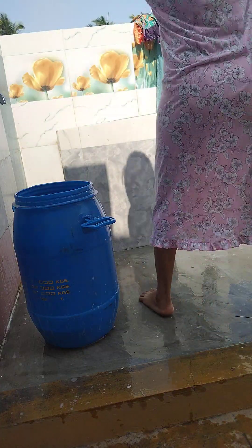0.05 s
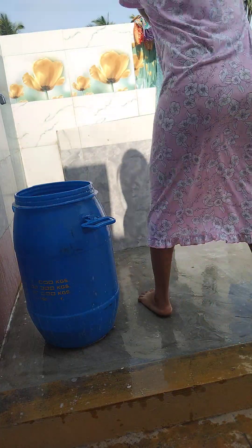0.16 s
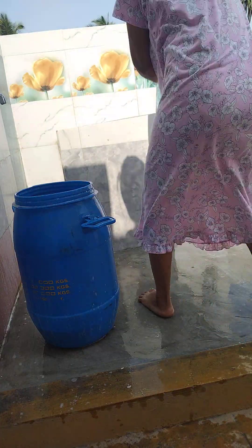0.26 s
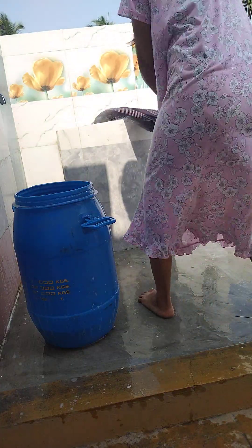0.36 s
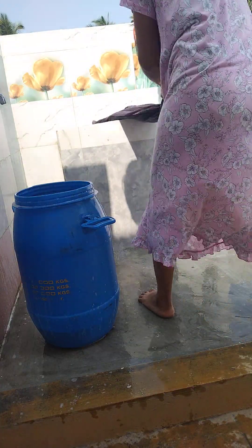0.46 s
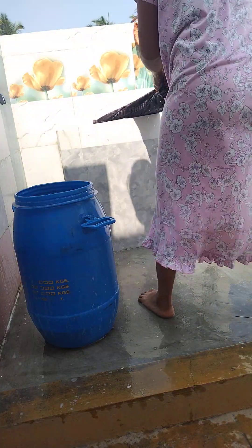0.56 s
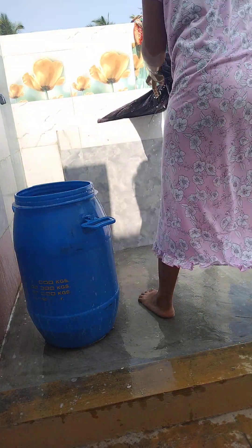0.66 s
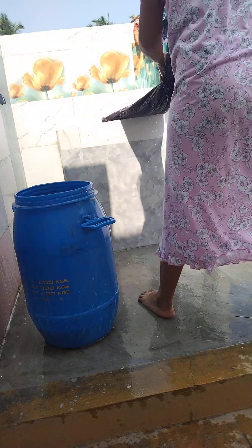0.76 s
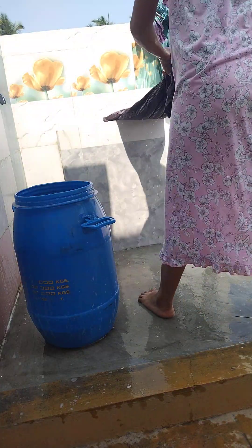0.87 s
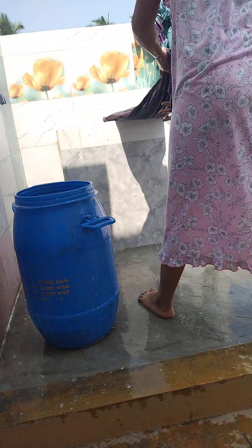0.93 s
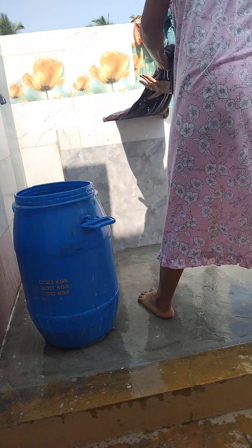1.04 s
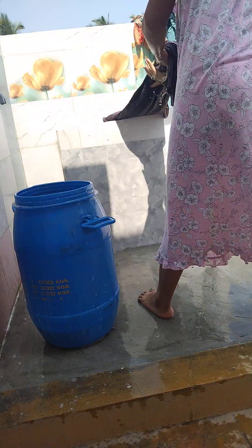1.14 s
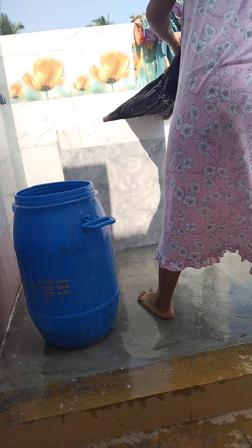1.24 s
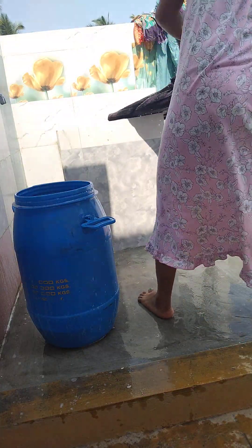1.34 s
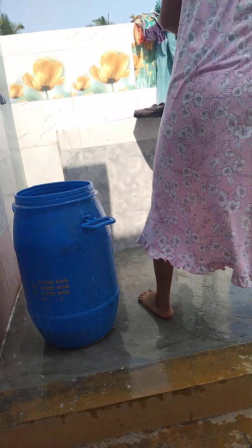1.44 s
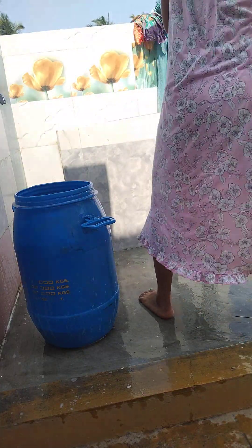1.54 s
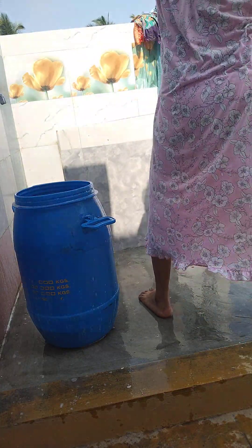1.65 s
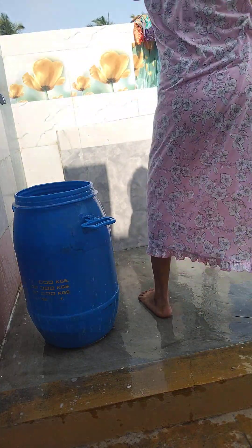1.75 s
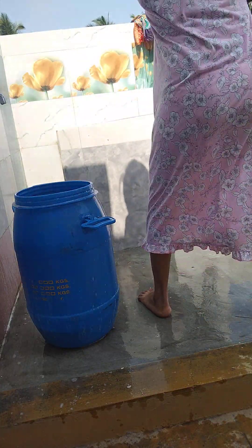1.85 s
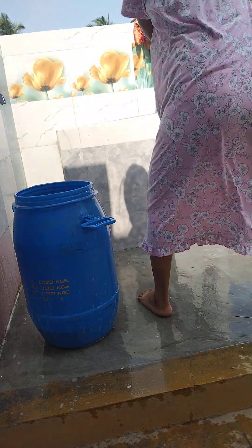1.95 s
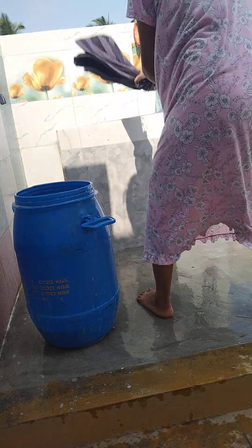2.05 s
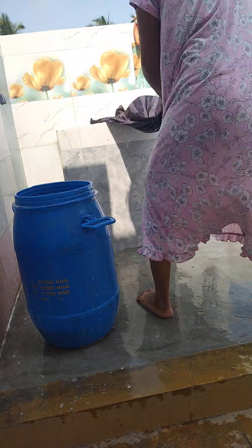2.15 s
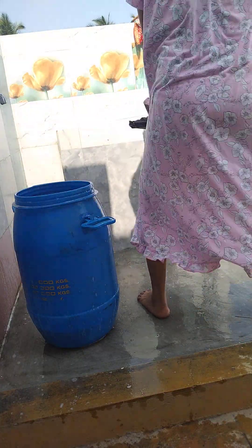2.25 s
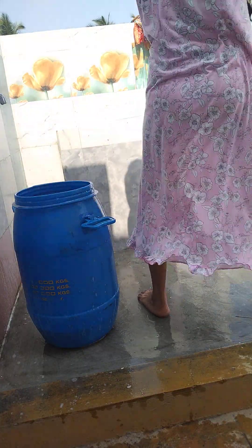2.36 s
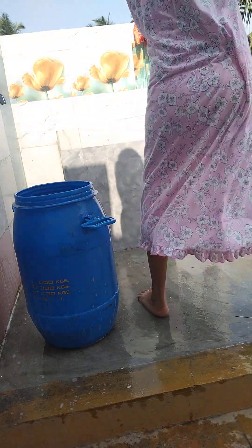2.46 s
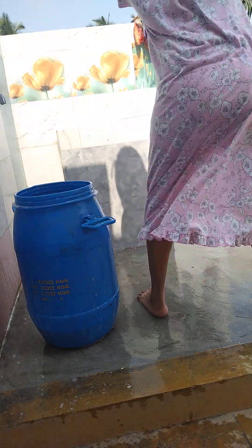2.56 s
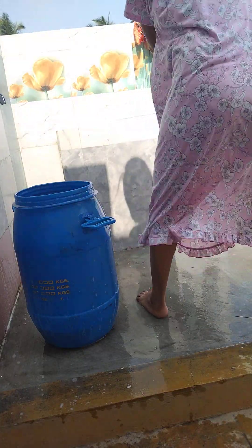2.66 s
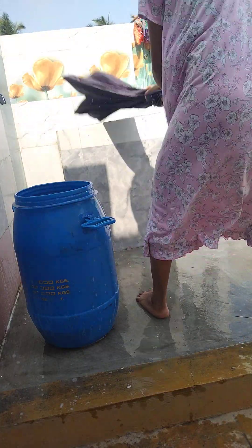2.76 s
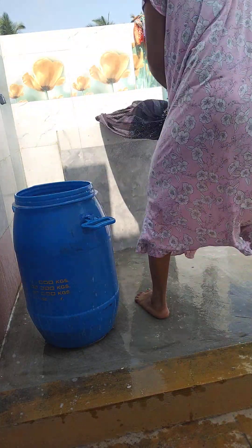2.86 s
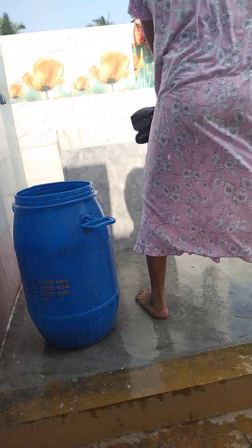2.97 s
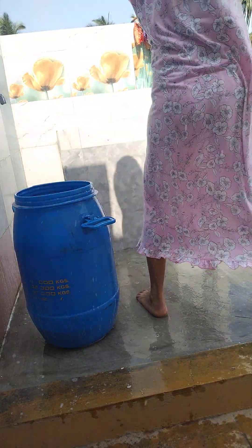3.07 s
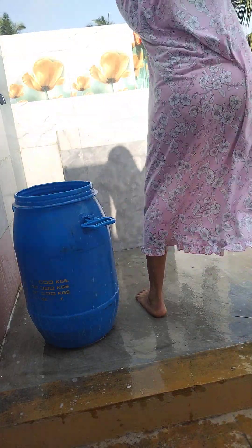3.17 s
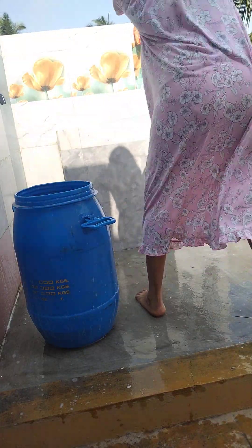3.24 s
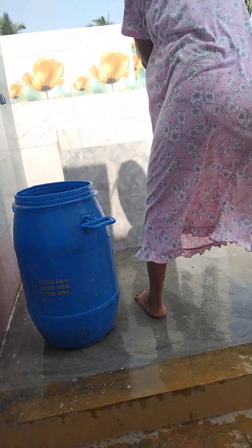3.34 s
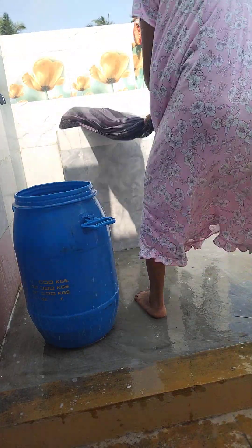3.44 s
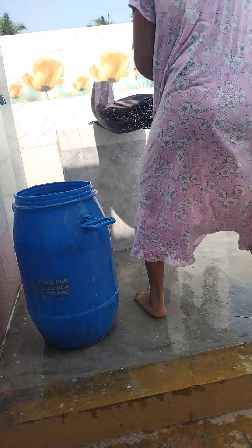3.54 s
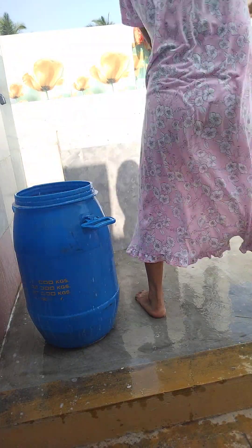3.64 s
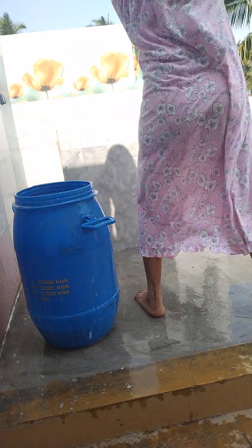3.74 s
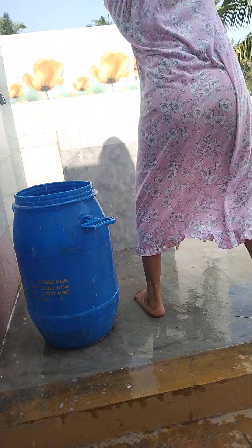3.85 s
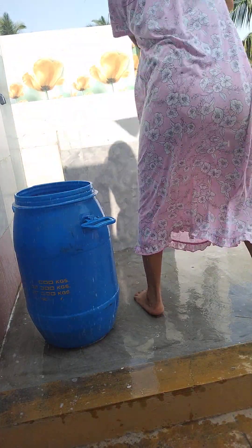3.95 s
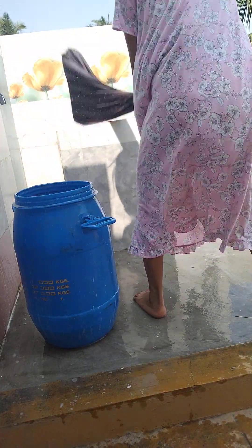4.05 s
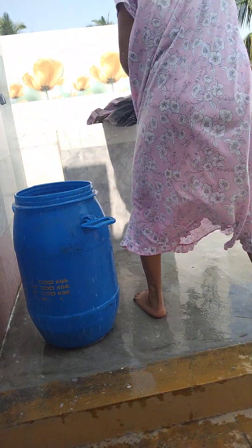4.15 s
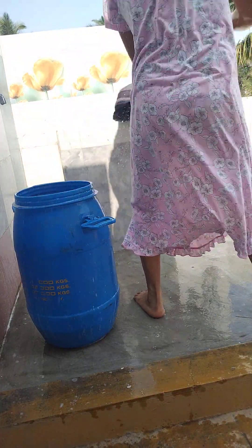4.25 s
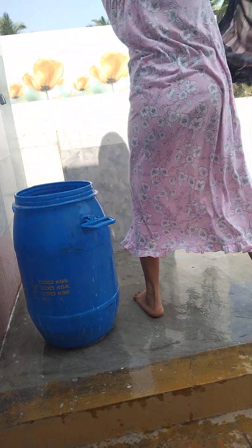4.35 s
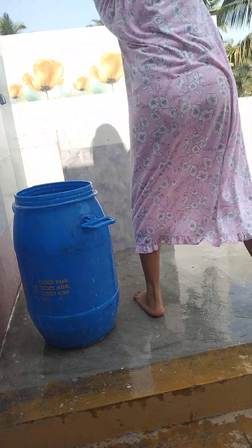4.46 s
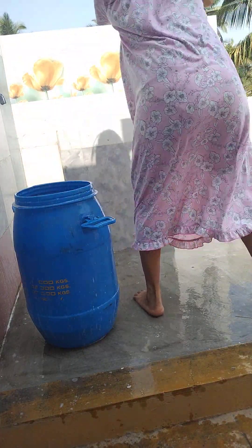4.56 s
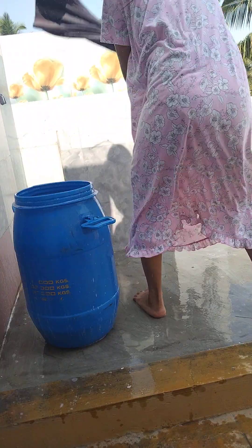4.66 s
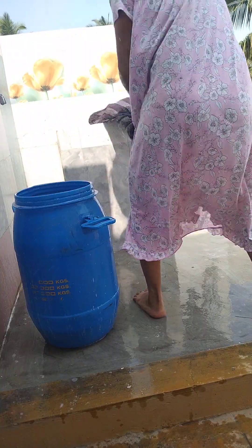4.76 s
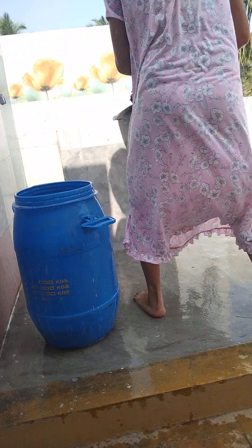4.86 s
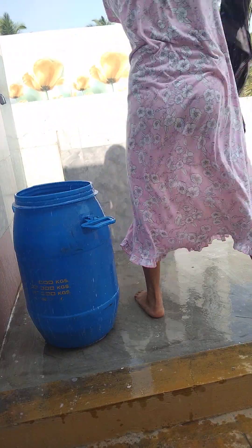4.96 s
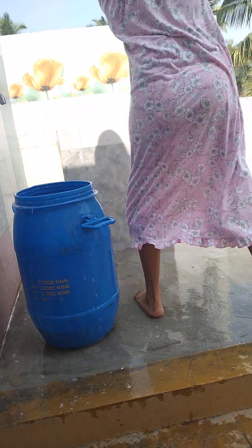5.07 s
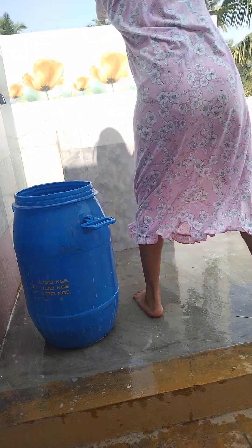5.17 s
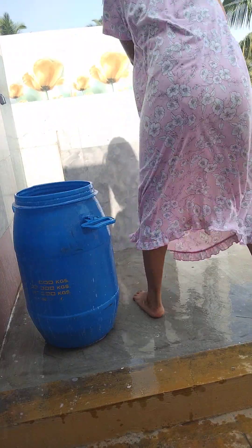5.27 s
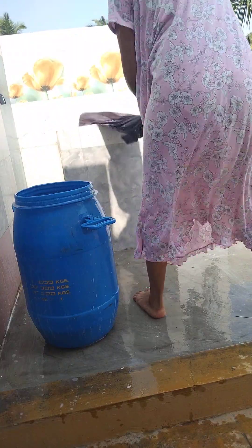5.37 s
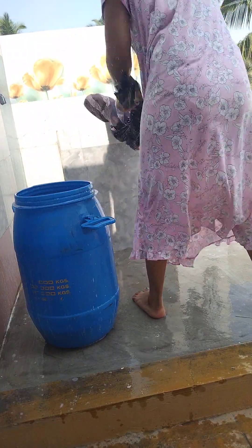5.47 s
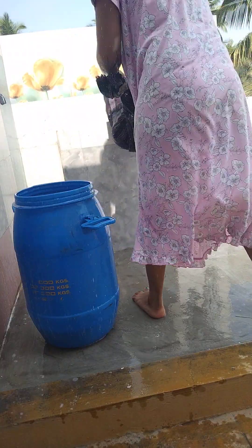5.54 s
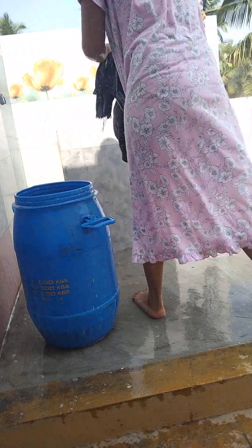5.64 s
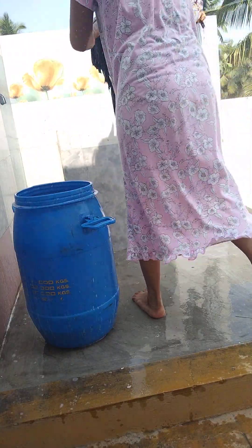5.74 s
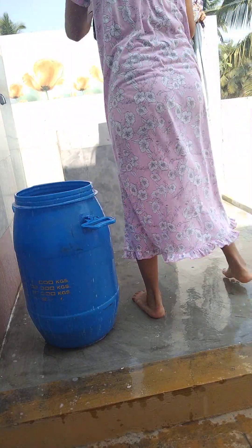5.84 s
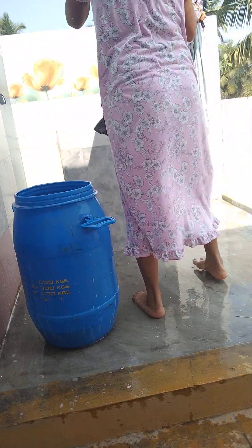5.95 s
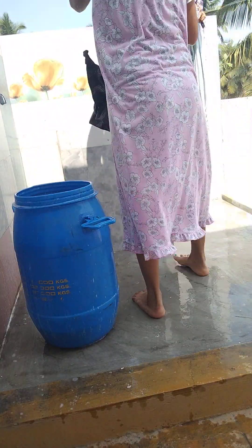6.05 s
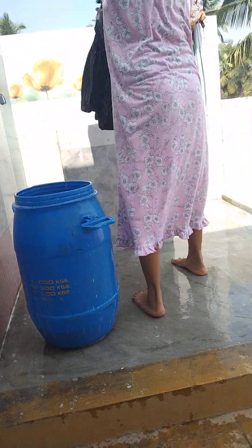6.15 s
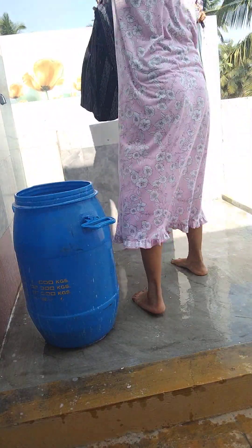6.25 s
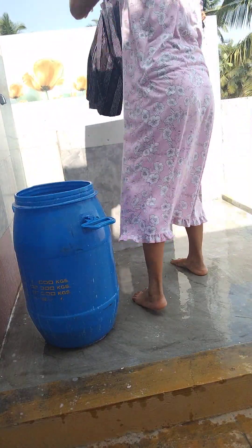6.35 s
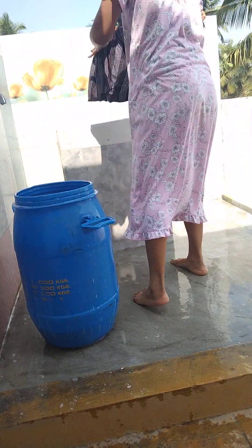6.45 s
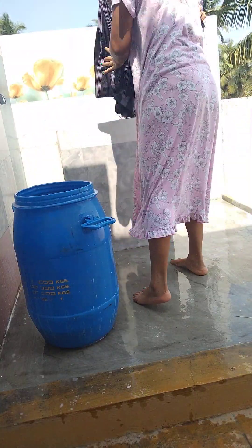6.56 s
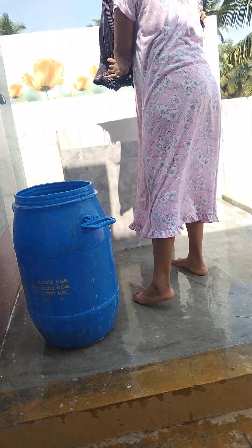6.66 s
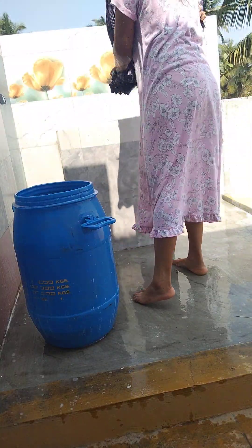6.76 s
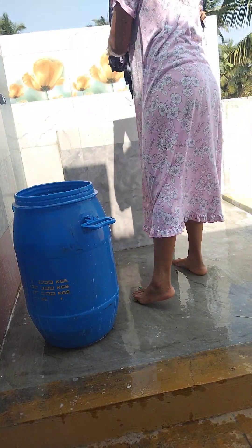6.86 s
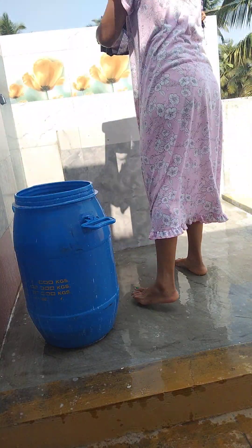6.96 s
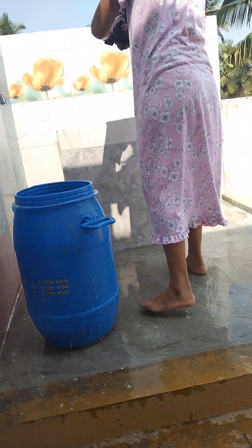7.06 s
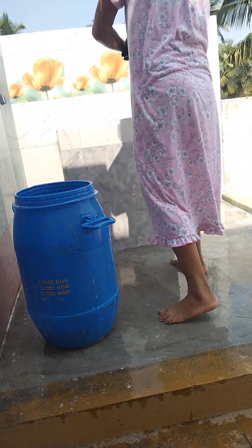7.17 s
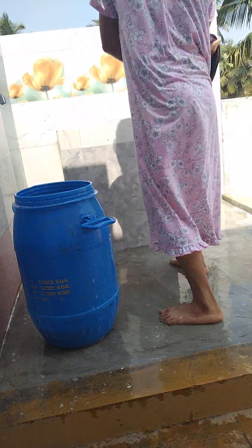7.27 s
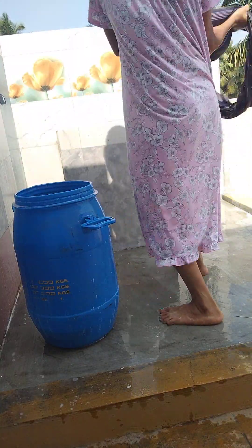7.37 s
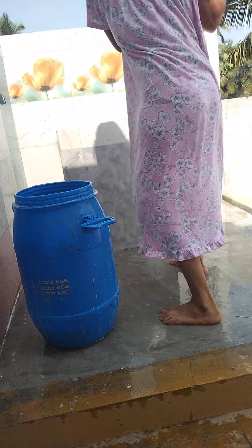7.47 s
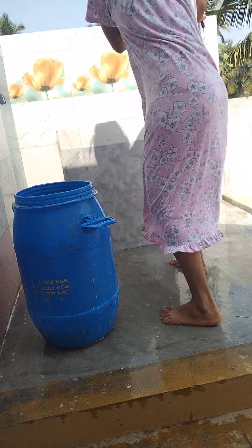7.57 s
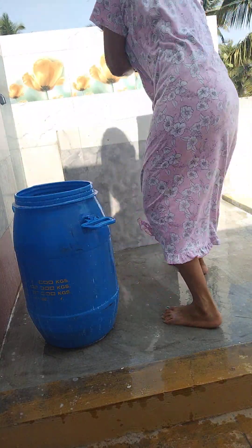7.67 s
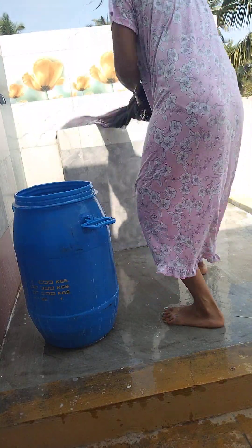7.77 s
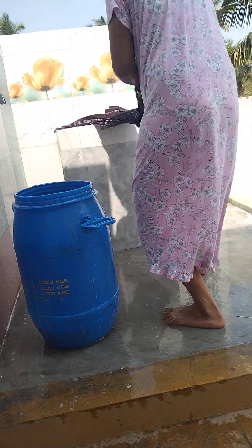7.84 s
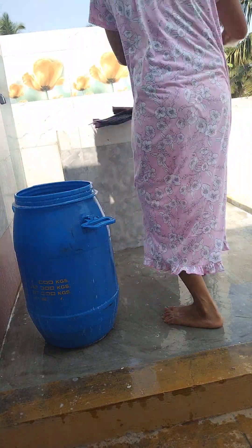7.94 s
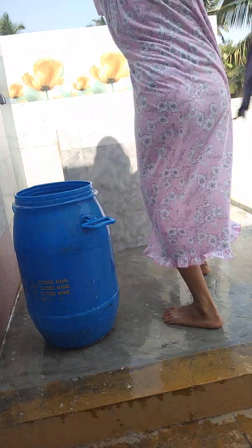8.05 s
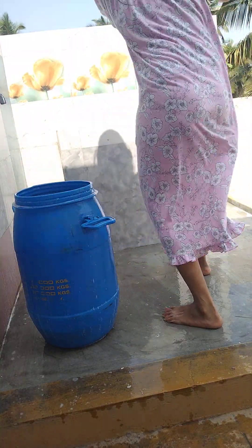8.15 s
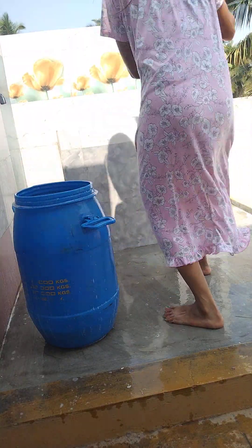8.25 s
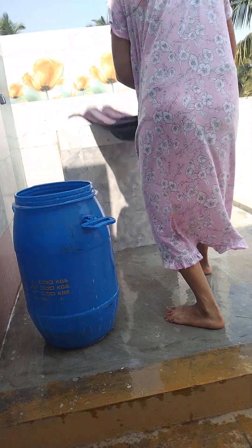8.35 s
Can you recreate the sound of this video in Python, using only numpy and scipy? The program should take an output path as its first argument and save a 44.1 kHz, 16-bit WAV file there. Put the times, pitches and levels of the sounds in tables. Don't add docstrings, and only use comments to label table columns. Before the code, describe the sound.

Wet cloth is swung and slapped hard on a stone slab again and again in a walled yard, with soft flops, drips and faint traffic hum.

```python
import sys
import numpy as np
from scipy import signal
from scipy.fft import rfft, irfft, next_fast_len
from scipy.io import wavfile
from scipy.ndimage import uniform_filter1d, map_coordinates

SR = 44100
rng = np.random.default_rng(int(sys.argv[2]) if len(sys.argv) > 2 else 0)


def voltage_ratio(decibels):
    exponent = np.asarray(decibels, float) / 20
    return 10 ** exponent


def file_out(sig):
    cols = np.atleast_2d(sig).T
    lim = np.clip(cols, -1, 1)
    pcm = np.round(lim * 32767).astype(np.int16)
    wavfile.write(sys.argv[1], SR, pcm)


N = 370881


def unit(x):
    return x / np.sqrt(np.mean(x ** 2) + 1e-20)


def along(points, hz, axis=1):
    table = np.transpose(points)
    return np.interp(np.log(hz + 1), np.log(table[0] + 1), table[axis])


def curves(rows):
    s, *cols = np.transpose(rows)
    return [np.interp(np.arange(N) / SR, s, c, left=c[0], right=c[-1]) for c in cols]


def wobble(rate_hz, count=N):
    knots = rng.standard_normal(int(count / SR * 1000) + 4)
    return map_coordinates(knots, [np.arange(count) * min(rate_hz, 999) / SR])


def noise(gain, count):
    m = next_fast_len(count)
    spectrum = rfft(rng.standard_normal(m)) * gain(np.fft.rfftfreq(m, 1 / SR))
    return unit(irfft(spectrum, m)[:count])


def shaped(points):
    return lambda hz: voltage_ratio(along(points, hz))


def add(track, s, sound):
    track[round(s * SR):][:len(sound)] += sound


# time_s, firing_hz
ENGINE = [(5.9, 31.2), (6.139, 31.86), (6.264, 32.88), (6.356, 32.5), (6.534, 33.15), (6.568, 33.2),
          (6.65, 35.8), (6.699, 35.7)]
# firing_multiple, level_db
ORDERS_DB = [(2, 0), (3, -5), (4, 0.5), (5, 6), (6, -0.5), (7, -19), (8, -13), (9, -24), (11, -15.5),
             (14, -34), (15, -20)]
# freq_hz, density_db_per_hz
TRAFFIC = [(18, -70), (30, -45.5), (48, -32), (52, -28.5), (64, -10.5), (113, -2), (138, 3.5), (260, -23),
           (340, -44), (570, -120)]


def traffic(level_db):
    firing_hz, = curves(ENGINE)
    start, end = ENGINE[0][0], ENGINE[-1][0]
    near = .78 * np.interp(np.arange(N) / SR, [start, start + .15, end - .2, end], [0, 1, 1, 0])
    turn = 2 * np.pi * np.cumsum(firing_hz) / SR
    orders = unit(sum(voltage_ratio(db + 3.7 * wobble(3.6)) * np.sin(k * turn + k * k) for k, db in ORDERS_DB))
    rumble = voltage_ratio(2.5 * wobble(14)) * noise(shaped(TRAFFIC), count=N)
    return voltage_ratio(level_db) * (near * orders + (1 - near) * rumble)


# time_s, level_db
ROAD = [(0, -56), (.33, -66.5), (.8, -48), (.98, -67), (1.2, -48.5), (1.4, -58.5), (2.1, -54), (3.1, -52.5),
        (3.5, -54), (4.0, -52.5), (4.4, -50.5), (5.2, -53), (5.9, -51.5), (6.0, -43), (6.4, -38.5),
        (6.7, -47.5), (7.1, -56.5), (8.41, -52.5)]
# peak_s, spread_s, drag_db, rustle_db, hiss_db
STROKES = [(.1, 0.069, -82, -73.5, -85.5), (.34, 0.11, -84.5, -75, -76), (.8, 0.074, -55, -59, -77),
           (1.15, 0.027, -71, -84, -74), (1.33, 0.1, -74, -79, -79), (1.519, 0.093, -86, -60, -63),
           (1.85, 0.11, -78.5, -82.5, -77.5), (2.08, 0.042, -68, -79, -79), (2.57, 0.15, -58.5, -60.5, -68),
           (3.249, .05, -56.5, -66, -70), (3.471, 0.094, -60, -96.5, -78.5), (3.86, 0.11, -61, -62, -69.5),
           (4.12, .1, -52.5, -74, -71), (4.55, 0.17, -53.5, -57, -66.5), (4.79, 0.064, -54.5, -64, -68.5),
           (5.17, 0.14, -50.5, -56.5, -67.5), (5.37, 0.092, -50.5, -68, -78),
           (5.881, 0.085, -50.5, -58.5, -71), (6.1, 0.13, -81, -79, -76.5), (6.4, 0.16, -70, -64, -70),
           (6.75, 0.11, -80, -65.5, -67.5), (7.201, 0.26, -93, -93, -75), (7.621, 0.079, -64, -68, -67.5),
           (8.329, .12, -58.5, -57.5, -65.5)]
# drag_db, rustle_db, hiss_db
REST_DB = (-86, -82, -79.5)
# traffic_let_through_db, drag_db, rustle_db, hiss_db
SLIDE_DB = (-26.5, -36.5, -30.5, -45.5)
SLIDE_S, SLIDE_T60_S = 0.12, 0.38


def handling():
    t = np.arange(N) / SR
    gains = np.array([voltage_ratio(curves(ROAD)[0]), *(np.full(N, voltage_ratio(db)) for db in REST_DB)])
    for s, _, thud_db, *_ in BLOWS:
        since = np.maximum(t - s, 0)
        swell = np.minimum(since / SLIDE_S, 1) ** 3
        decay = voltage_ratio(-60 * np.maximum(since - SLIDE_S, 0) / SLIDE_T60_S)
        gains += voltage_ratio(thud_db + np.c_[list(SLIDE_DB)]) * swell * decay
    for s, spread, *levels_db in STROKES:
        gains[1:] += voltage_ratio(np.c_[levels_db]) * np.exp(-((t - s) / spread) ** 2)
    return gains


def patchy(x, patchy_db, size):
    z = signal.stft(x, nperseg=512)[2]
    field = uniform_filter1d(rng.standard_normal(z.shape), size=size[0], axis=0)
    field = uniform_filter1d(field, size=size[1], axis=1)
    return unit(signal.istft(z * voltage_ratio(patchy_db * unit(field)), nperseg=512)[1][:N])


# freq_hz, density_db_per_hz
DRAG = [(140, -41), (230, -12), (300, -8), (437, -3), (577, -15.5), (950, -20.5), (1240, -49.5),
        (2090, -120)]
RUSTLE = [(560, -32.5), (950, -1), (1330, 3.5), (1930, -10), (2120, -1.5), (3600, -14), (4680, -46.5),
          (7920, -120)]
HISS = [(1760, -29.5), (3000, -11), (3350, -3.5), (3870, -2.5), (5700, -6), (7770, -5), (10800, -17.5),
        (15600, -18.5)]


def around():
    drag = patchy(noise(shaped(DRAG), count=N), patchy_db=4.5, size=(2, 20))
    rustle = patchy(noise(shaped(RUSTLE), count=N), patchy_db=4, size=(2, 24))
    hiss = patchy(noise(shaped(HISS), count=N), patchy_db=2, size=(4, 30))
    return np.sum(handling() * [traffic(0), drag, rustle, hiss], axis=0)


# start_s, length_s, centre_hz, level_db
LEAKS = [(0.01, 0.34, 1113, -75), (0.01, 0.34, 1540, -76), (0.0, 0.44, 2280, -72),
         (0.075, 0.22, 5850, -77.5), (0.926, 0.093, 450, -73), (1.246, 0.2, 1390, -73),
         (1.27, 0.3, 2292, -77), (1.64, .56, 2292, -75), (1.75, .2, 480, -69), (1.72, .2, 1300, -74),
         (1.76, .17, 1700, -75), (2.08, .11, 450, -68), (1.94, .08, 1080, -76), (.34, .11, 420, -62),
         (.17, .13, 1650, -73), (.36, .1, 1080, -66), (1.24, .08, 690, -70), (1.3, 0.06, 5100, -80),
         (1.26, 0.26, 350, -69), (1.449, 0.13, 814, -67.5), (2.05, 0.14, 1700, -75),
         (1.936, 0.34, 621, -68.5), (2.704, 0.17, 1313, -71.5), (3.372, 0.19, 432, -62),
         (4.028, 0.1, 1416, -68.5), (4.68, 0.031, 6450, -62), (0.1, 0.14, 1914, -78),
         (5.948, 0.77, 2332, -77.5), (6.1, 0.52, 1040, -75), (6.099, 0.66, 1362, -72.5),
         (6.15, 0.35, 465, -64), (6.255, 0.78, 1710, -81), (6.304, 0.324, 2850, -78.5),
         (6.76, 0.25, 1384, -76), (7.02, .2, 1450, -75), (7.03, .25, 1320, -76), (6.22, .36, 1480, -72),
         (6.3, .36, 940, -73), (6.02, .1, 1120, -74), (6.15, .1, 420, -66), (6.3, .2, 540, -69),
         (1.85, 0.31, 1210, -83), (7.032, 0.26, 3380, -81), (7.06, 0.22, 2900, -79), (7.25, .2, 2800, -80),
         (7.05, .2, 3800, -84), (7.479, 0.087, 367, -71.5), (7.0, .13, 4430, -77), (7.12, 0.12, 4880, -80)]
LEAK_WIDTH_HZ, LEAK_WIDTH_SHARE, LEAK_BRIEF_S = 20, .008, .09


def leaks():
    out = np.zeros(N + SR)
    for s, length, centre_hz, db in LEAKS:
        width_hz = (LEAK_WIDTH_HZ + LEAK_WIDTH_SHARE * centre_hz) * (1 + (LEAK_BRIEF_S / length) ** 2)
        span = round(length * SR)
        line = noise(lambda f: np.exp(-((f - centre_hz) / width_hz) ** 2), count=span)
        flicker = voltage_ratio(2.5 * wobble(18, count=span) + 2 * wobble(6, count=span))
        add(out, s, voltage_ratio(db + 1.5) * line * flicker * signal.windows.tukey(span, .3))
    return out[:N]


# freq_hz, t60_s, level_db
YARD = [(150, 0.6, -0.5), (494, 0.47, -0.5), (2000, 0.41, -1.5), (7700, 0.46, -1.5), (15100, 0.94, -12.5)]


def yard(x, smear, wet_db=0):
    hz, t, z = signal.stft(rng.standard_normal(SR * 3 // 4), SR, nperseg=512)
    energy = np.abs(rfft(x, 8192)) ** 2
    fine, broad = (uniform_filter1d(energy, size=bins)[::16] for bins in (44, 200))
    power = np.where(hz < 1500, fine, broad)
    t60 = along(YARD, hz)
    level = voltage_ratio(wet_db + along(YARD, hz, axis=2))
    level = level * np.sqrt(np.abs(power) / (t60 * SR / (6 * np.log(10))))
    out = signal.istft(z * level[:, None] * voltage_ratio(-60 * t / t60[:, None]), SR, nperseg=512)[1]
    onset = 1 - np.exp(-(np.arange(len(out)) / SR / smear) ** 2)
    out *= onset * voltage_ratio(1.3 * wobble(150, count=len(out)))
    out[:len(x)] += x
    return out


def burst(t, db, hz, rise):
    u = np.maximum(t / rise + 1, 0)
    return voltage_ratio(db) * u * np.exp(1 - u) * np.sin(2 * np.pi * hz * rise * u)


# freq_hz, density_db_per_hz
SMACK = [(530, -22.5), (900, -3), (1070, -10), (1330, -4), (1890, -10.5), (2440, -12), (4500, -25),
         (5850, -40), (9900, -120)]
SPRAY = [(2350, -28), (4000, -6), (6400, -8.5), (7800, -2.5), (9400, -14), (14700, -11), (15800, -20),
         (16500, -62.5)]


def contact(hold, t60, thud_db, smack_db, spray_db, body, lumps_db, rise):
    t = np.arange(SR // 6) / SR
    folds = voltage_ratio(lumps_db * wobble(260, count=len(t)))

    def fall(slow, soft):
        return (1 - np.exp(-t / (soft * rise))) * voltage_ratio(-60 * np.maximum(t - slow * hold, 0) / (slow * t60))

    thud = voltage_ratio(thud_db) * fall(1.2, 2.0) * noise(body, count=len(t))
    smack = voltage_ratio(smack_db) * fall(0.78, 0.76) * noise(shaped(SMACK), count=len(t))
    spray = voltage_ratio(spray_db) * fall(0.74, 0.11) * noise(shaped(SPRAY), count=len(t))
    return thud + folds * (smack + spray)


# start_s, smack_db, thud_db,
# spray_db, pocket_hz
FLOPS = [(0.3531, -48, -50.5, -70, 430), (0.39, -38, -49.5, -61.5, 405), (0.5602, -14, -22.5, -36.5, 450),
         (1.7526, -48, -43, -60, 560), (1.792, -46.5, -50, -67, 462), (2.5815, -31.5, -40.5, -48, 865),
         (2.843, -36.5, -38.5, -61.5, 392), (3.508, -46, -46, -74, 520), (4.1065, -48, -52, -60.5, 468),
         (5.088, -29, -34, -45, 330), (5.4113, -33, -34, -58, 750), (5.5669, -17.5, -25.5, -42, 340),
         (6.7148, -31.5, -33.5, -52, 417), (7.84, -68, -52, -85, 539)]
# start_s,
# smack_db, thud_db, spray_db, pocket_hz
PATS = [(0.453, -25, -39, -54.5, 900), (3.548, -21, -36, -46, 900), (4.817, -26.5, -37.5, -44.5, 900),
        (7.9011, -9.5, -20, -44, 500), (2.4787, -50, -54, -45.5, 470), (2.5397, -51, -47, -54.5, 484),
        (3.8688, -42, -39, -56, 920), (3.958, -44.5, -38.5, -56, 424), (4.499, -32.5, -49, -51, 523),
        (4.5467, -41, -35, -74, 436), (4.7211, -54.5, -29.5, -71, 428), (5.39, -57, -43, -72, 866),
        (5.4392, -16.5, -28, -40, 450), (5.8557, -41, -51, -45, 446), (7.5886, -22, -35, -44.5, 960),
        (7.646, -38, -39, -66, 900), (7.9911, -22, -22, -48, 390)]
# start_s, plop_db, plop_hz, spray_db
DRIPS = [(0.79, -75, 3000, -58), (0.995, -85, 3030, -64), (1.13, -56, 2650, -62), (8.09, -66, 3000, -50),
         (1.0544, -72, 3440, -45), (1.1235, -52, 1450, -50), (1.6797, -83, 2000, -62),
         (3.168, -77, 2000, -58), (3.2013, -42, 1500, -49.5), (3.354, -76, 1405, -57.5),
         (4.6086, -58, 1300, -61), (5.1959, -53, 1300, -59), (6.197, -49, 2600, -46),
         (7.2494, -62, 4300, -57), (7.368, -48, 2900, -52), (7.537, -50, 1520, -64),
         (8.143, -51, 1410, -56), (8.2038, -48.5, 1410, -53), (8.292, -51, 1403, -60)]
# flops_s, pats_s, drips_s
RISES_S = (0.0055, .002, 0.0033)
FLOP_T60_S, PAT_T60_S, DRIP_T60_S = 0.14, .038, 0.05
DRIP_SMACK_DB = -9.5
PLOP_DB, PLOP_CYCLES = -4, 2.2


def flops():
    out = np.zeros(N + SR)
    drips = [(s, plop + DRIP_SMACK_DB, plop, spray, hz) for s, plop, hz, spray in DRIPS]
    kinds = zip((FLOPS, PATS, drips), (FLOP_T60_S, PAT_T60_S, DRIP_T60_S), RISES_S)
    for rows, t60, rise in kinds:
        for s, smack_db, thud_db, spray_db, pocket_hz in rows:
            pocket = lambda f: (f / (pocket_hz ** 2 - f * f + .36j * f * pocket_hz)) ** 2
            hit = contact(0.0027, t60, thud_db - 5, smack_db - 9.5, spray_db - 3.5, pocket,
                          lumps_db=3.0, rise=rise)
            swell = PLOP_CYCLES / pocket_hz
            plop = burst(np.arange(len(hit)) / SR - swell, thud_db + PLOP_DB, pocket_hz, swell)
            add(out, s, yard(hit + plop, smear=.006, wet_db=-2))
    return out[:N]


# peak_s, spread_s, level_db
SWISHES = [(0.454, 0.01, -42.5), (1.51, 0.055, -60), (2.18, 0.016, -52.5), (2.897, 0.01, -58.5),
           (3.544, 0.018, -59.5), (4.17, .012, -61.5), (4.813, .012, -52.5), (7.861, .04, -59.5),
           (7.883, 0.0136, -46.5)]
# freq_hz, density_db_per_hz
SWISH = [(400, -42.5), (700, -3), (1300, 3.5), (2500, -4), (4000, -13), (8000, -14), (15000, -27.5)]


def swishes():
    t = np.arange(N) / SR
    speed = sum(voltage_ratio(db) * np.exp(-((t - s) / spread) ** 2) for s, spread, db in SWISHES)
    return speed * noise(shaped(SWISH), count=N)


# freq_hz, end_s (suppressor has shut the ring by 60 dB), rise_s
BARREL = [(165.7, 0.3768, 0.0067), (121.7, 0.1043, .006)]
# start_s, upper_mode_db, lower_mode_db
BOOMS = [(0.457, -34, -29), (2.185, -32, -24), (2.9, -31.5, -22.5), (3.554, -31.5, -35),
         (4.174, -23.5, -23), (4.832, -26, -34), (5.468, -33.5, -32), (7.89, -27, -25.5)]


def barrel():
    out, t = np.zeros(N + SR), np.arange(SR // 2) / SR
    for s, *levels_db in BOOMS:
        for db, (hz, end, rise) in zip(levels_db, BARREL):
            level = (1 - np.exp(-t / rise)) * voltage_ratio(db - 60 * (t / end) ** 3)
            add(out, s, level * np.sin(2 * np.pi * hz * t))
        puff = noise(lambda f: np.exp(-((f - 92) / 22) ** 2), count=len(t))
        add(out, s, (1 - np.exp(-t / 0.0067)) * voltage_ratio(levels_db[1] - 1.0 - 60 * t / 0.37) * puff)
    return out[:N]


# freq_hz, width_hz, level_db
SLAB = [(238.4, 9.8, 3.5), (500, 170, -5.5), (814, 81, -5)]


def slab(f):
    modes = sum((-1) ** k * voltage_ratio(db) * 1j * f * w / (c * c - f * f + 1j * f * w)
                for k, (c, w, db) in enumerate(SLAB))
    return modes / (1 + (f / 1100) ** 4) / (1 + (180 / (f + 1)) ** 4)


# start_s, smack_db, thud_db, spray_db, contact_s
BLOWS = [(0.46, -6, -16.5, -30, 0.016), (2.1868, -7.5, -13, -25, 0.016), (2.9049, -10.5, -12, -29, 0.018),
         (3.5524, -5, -11.5, -29.5, 0.003), (4.1778, -10, -15.5, -27, 0.011),
         (4.8197, -6.5, -11, -29, 0.0065), (5.4685, -5, -14, -30, 0.0056), (7.8852, -12, -15, -29.5, 0.021)]
# freq_hz, level_db, t60_s
STONE = [(253, -2, .2), (369, -2, .17), (468, -1, 0.33), (526, -16, .15), (596, -11, .15), (820, -5, .12),
         (1324, -8, 0.11), (2084, -13, .07)]
# peak_s, level_db, pitch_hz, width_ms
POCKETS = [(0.4623, -13.1, 2360, 1.4), (0.4657, -16.1, 470, 11.9), (0.468, -15.1, 940, 5.6),
           (0.4723, -19.6, 3350, 2.2), (0.4834, -21.5, 880, 12.9), (0.4869, -26.2, 2530, 1.9),
           (2.1883, -14.5, 2050, 4.7), (2.1914, -15.3, 2910, 1.4), (2.1928, -14.8, 1440, 4.7),
           (2.1966, -16.5, 2910, 3.0), (2.2001, -15.9, 2530, 1.7), (2.2037, -14.3, 1250, 5.3),
           (2.908, -14.9, 2050, 5.9), (2.912, -14.9, 2200, 6.0), (2.9121, -14.5, 1340, 5.7),
           (2.9169, -15.0, 1440, 3.2), (2.92, -10.2, 580, 20.5), (2.9302, -10.8, 540, 24.0),
           (3.5565, -17.6, 3130, 1.2), (3.5573, -14.6, 760, 5.5), (3.5599, -15.9, 1250, 6.1),
           (3.5683, -18.4, 620, 19.1), (3.5713, -27.8, 2360, 1.9), (3.5867, -24.2, 1540, 2.5),
           (4.1804, -22.5, 2360, 1.4), (4.1856, -16.4, 1910, 1.9), (4.189, -14.8, 820, 13.1),
           (4.2008, -20.9, 820, 21.7), (4.208, -20.2, 940, 13.3), (4.22, -20.6, 660, 6.8),
           (4.8222, -18.9, 1660, 2.8), (4.8261, -14.7, 820, 15.9), (4.8262, -22.2, 2720, 1.4),
           (4.828, -11.8, 470, 8.3), (4.8328, -14.1, 760, 12.8), (4.8404, -15.9, 1340, 6.4),
           (5.4715, -20.6, 2720, 2.1), (5.4735, -13.8, 820, 14.3), (5.4741, -16.7, 1340, 3.3),
           (5.4765, -20.6, 2050, 2.7), (5.4794, -21.6, 3130, 3.1), (5.4824, -14.6, 760, 14.4),
           (7.8908, -11.6, 1780, 2.3), (7.9021, -15.7, 760, 10.1), (7.9026, -22.7, 2530, 1.9),
           (7.9048, -23.6, 3600, 1.0), (7.9069, -19.9, 1540, 3.0), (7.9115, -14.4, 470, 12.2),
           (2.1915, -9, 450, 7), (2.202, -10, 610, 7), (2.234, -18, 250, 9), (2.195, -16, 790, 14),
         (2.915, -9, 440, 6), (2.922, -12, 248, 22), (2.924, -15, 824, 14), (3.562, -15, 242, 14),
         (4.186, -13, 380, 6), (4.194, -16, 300, 8), (5.475, -14, 430, 10), (7.902, -12, 420, 4),
         (7.93, -18, 474, 22), (4.836, -12, 400, 12)]
SETTLE_S, SETTLE_PER_CONTACT = 0.11, 3.7
BLOW_RISE_S = .0016
WIDTH_PER_RISE, LONGEST_MS = 2900, 14


def blows():
    out, t = np.zeros(N + SR), np.arange(SR // 4) / SR
    for s, smack_db, thud_db, spray_db, hold in BLOWS:
        t60 = SETTLE_S - SETTLE_PER_CONTACT * hold
        hit = contact(hold, t60, thud_db - 6.5, smack_db - 11, spray_db - 1.8, slab,
                      lumps_db=2.5, rise=BLOW_RISE_S)
        since = np.arange(len(hit)) / SR
        air = sum(burst(since + s - at, db - 0.3, hz, min(ms, LONGEST_MS) / WIDTH_PER_RISE)
                  for at, db, hz, ms in POCKETS if abs(at - s) < SLIDE_S)
        air = air * (1 - np.exp(-since / BLOW_RISE_S))
        add(out, s, yard(hit + air, smear=0.009, wet_db=-1.1))
        echo = contact(0.011, 0.13, thud_db - 16, smack_db - 20.5, spray_db - 30.5, slab,
                       lumps_db=2.5, rise=0.023)
        add(out, s + .095, yard(echo, smear=0.0077))
        ring = sum(voltage_ratio(db + rng.normal(0, 3) - 60 * t / last) * np.sin(2 * np.pi * (hz * t + rng.random()))
                   for hz, db, last in STONE)
        add(out, s, voltage_ratio(thud_db - 9.5) * (1 - np.exp(-t / .005)) * ring)
    return out[:N]


def scene():
    return (around() + leaks() + flops() + swishes() + barrel() + blows())[None]


# freq_hz, level_db_per_bin
SHUT = [(200, -125), (400, -103), (1000, -99), (3000, -97.5), (8000, -102), (15000, -108)]


def suppress(x, depth_db, unsure_db):
    hz, _, z = signal.stft(x, SR, nperseg=1024)
    power = uniform_filter1d(uniform_filter1d(np.abs(z) ** 2, size=7, axis=1), size=5, axis=2)
    drift = uniform_filter1d(rng.standard_normal(z.shape), size=5, axis=1)
    drift = uniform_filter1d(drift, size=22, axis=2)
    threshold_db = along(SHUT, hz)[:, None] + unsure_db * unit(drift)
    over = (np.abs(power) / voltage_ratio(2 * threshold_db)) ** 2
    gain = (over + voltage_ratio(depth_db)) / (over + 1) / (1 + (48 / (hz[:, None] + 1)) ** 4)
    gain *= np.where(hz > 15750, voltage_ratio(-16), 1)[:, None]
    return signal.istft(z * gain, SR, nperseg=1024)[1][:, :N]


def top_cut(x):
    return signal.sosfilt(signal.butter(12, 16810, fs=SR, output="sos"), x)


def record(dry):
    clean = suppress(dry, depth_db=-14, unsure_db=7)
    held = clean / (1 + np.abs(clean / 1.2) ** 4) ** (1 / 4)
    return top_cut(held)


dry = scene()
out = record(dry)
file_out(out)
```